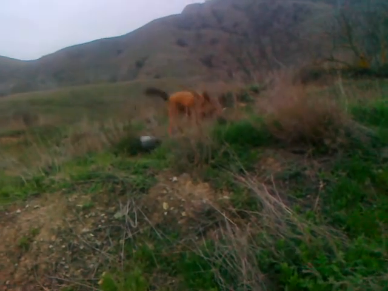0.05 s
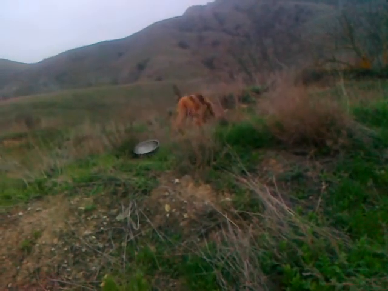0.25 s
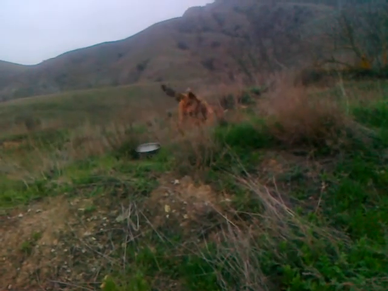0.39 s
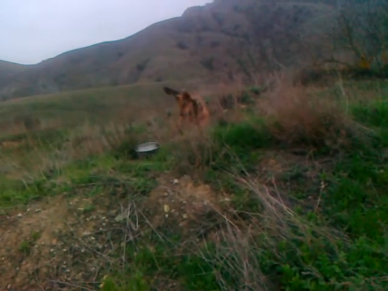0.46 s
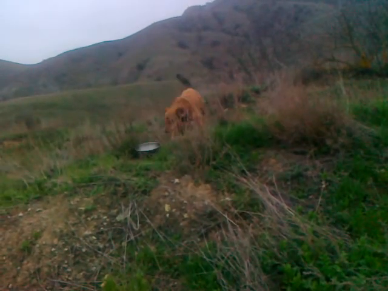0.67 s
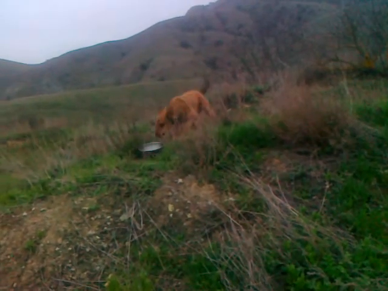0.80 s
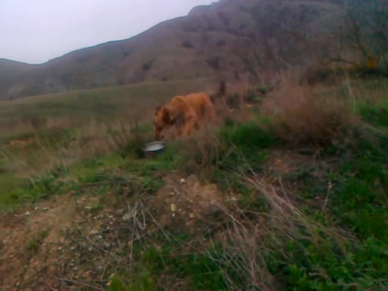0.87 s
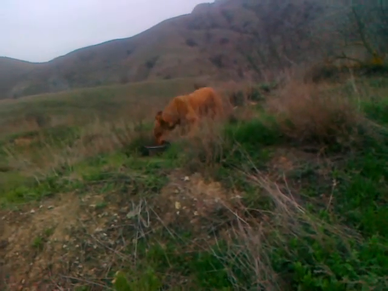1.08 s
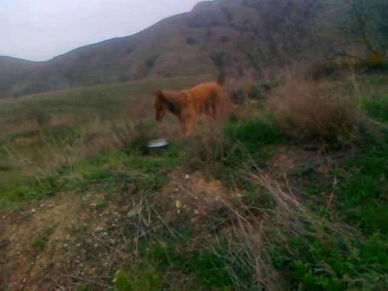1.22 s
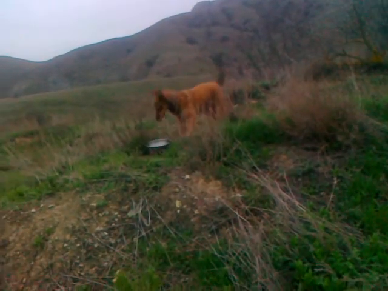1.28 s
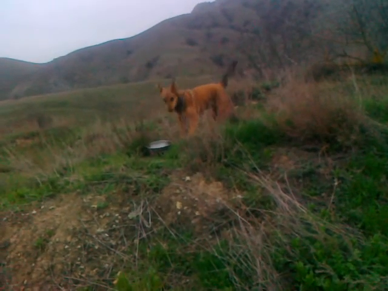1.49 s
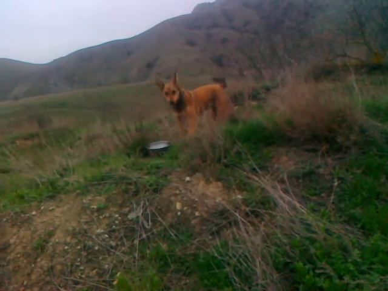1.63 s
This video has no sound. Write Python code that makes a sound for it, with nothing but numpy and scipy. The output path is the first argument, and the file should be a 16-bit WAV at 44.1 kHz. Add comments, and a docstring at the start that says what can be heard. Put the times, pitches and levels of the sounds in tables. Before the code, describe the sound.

Two quick, raspy dog barks stand out over wind buffeting the microphone outdoors. A metal bowl first lands with a dull thud and faint clinks, then come the barks, followed by a quiet huff.

```python
"""Wind rumbles on the microphone throughout, over faint hiss, on a grassy hillside.
First a steel bowl thuds on the turf and clinks faintly. At 0.6 s and 0.85 s a dog gives two short
harsh barks, vocal-fold pulses and turbulence ringing its throat: each arches in pitch, breaks into
a rasp, settles on a clear note and drops. A soft huff follows at 1.1 s.
The slope answers each sound briefly."""
import sys
import numpy as np
from scipy import signal
from scipy.fft import rfft, irfft, next_fast_len
from scipy.io import wavfile
from scipy.ndimage import uniform_filter1d, minimum_filter1d, map_coordinates

SR = 44100
rng = np.random.default_rng(int(sys.argv[2]) if len(sys.argv) > 2 else 0)


def wav_record(signal):
    """Record a signal, one row per channel, as 16-bit PCM in the file named by sys.argv[1]."""
    frames = np.transpose(np.atleast_2d(signal))
    bounded = np.clip(frames, -1, 1)
    # unit amplitude maps onto the largest positive 16-bit level
    quanta = np.round(bounded * 32767).astype(np.int16)
    wavfile.write(sys.argv[1], SR, quanta)


N = 72765


def amp(db):
    """dB to gain."""
    return 10 ** (np.asarray(db) / 20)


def unit(x):
    """Scale to rms 1."""
    return x / np.sqrt(np.mean(x ** 2) + 1e-20)


def steady(x, size):
    """Hold the short-term rms at 1; size in samples."""
    power = uniform_filter1d(uniform_filter1d(x ** 2, size), size)
    return x / np.sqrt(np.abs(power) + 1e-20)


def along(points, hz):
    """Read (f/Hz, value) points on a log axis."""
    f, values = np.transpose(points)
    return np.interp(np.log(hz + 1), np.log(f + 1), values)


def clock():
    """Sample times in s."""
    return np.arange(N) / SR


def curves(rows):
    """One value per sample for each column after the time."""
    times_s, *columns = np.transpose(rows)
    return [np.interp(clock(), times_s, column) for column in columns]


def wobble(knots_per_s):
    """Smooth random curve."""
    return map_coordinates(rng.standard_normal(N // 8), [clock() * knots_per_s], mode="wrap")


def filtered(x, response):
    """Apply a frequency response."""
    size = next_fast_len(N + SR // 2)
    return irfft(rfft(x, size) * response(np.fft.rfftfreq(size, 1 / SR)), size)[:N]


def below(hz, edge_hz, order):
    """Gain of a smooth low-pass."""
    return 1 / (1 + (hz / edge_hz) ** order)


def noise(colour):
    """Coloured noise, rms 1."""
    return unit(filtered(rng.standard_normal(N), lambda hz: amp(along(colour, hz))))


def resonator(colour, hz):
    """Minimum-phase response of a cavity with this colour."""
    cepstrum = irfft(np.log(amp(along(colour, hz))))
    half = len(cepstrum) // 2
    fold = np.concatenate([[1], np.full(half - 1, 2), [1], np.zeros(half - 1)])
    return np.exp(rfft(cepstrum * fold))


# hiss spectrum: f/Hz, relative level/dB
HISS_COLOUR = [(500, 4.5), (3000, -2), (8000, -2), (15000, -4)]
# hiss envelope: t/s, level/dB
HISS_ENVELOPE = [(0, -74), (.58, -75), (.64, -90), (1.65, -84)]


def microphone_hiss():
    """Faint microphone noise; the level dips at the first bark."""
    return amp(curves(HISS_ENVELOPE)[0]) * noise(HISS_COLOUR)


# gusts: t/s, rumble level/dB, rush level/dB
GUSTS = [(0, -27.5, -59), (.13, -28, -60), (.18, -27.5, -53), (.23, -27, -46.5), (.31, -27.5, -48),
         (.375, -30, -57), (.42, -30, -50), (.465, -29, -48), (.505, -30.5, -56), (.54, -30.5, -48),
         (.60, -30, -52), (.66, -38, -54), (.82, -37, -57), (1.05, -35.5, -54), (1.22, -33, -50),
         (1.33, -31.5, -47), (1.39, -31, -50), (1.44, -30, -45.5), (1.485, -29.5, -50), (1.53, -28.5, -45),
         (1.65, -29.5, -50)]
# low and mid wind spectra: f/Hz, relative level/dB
RUMBLE_COLOUR = [(10, -16), (30, -6), (65, 2), (110, -2), (200, -4.5), (320, -7), (430, -14.5), (600, -27),
                 (1000, -46), (2000, -76), (4000, -100)]
RUSH_COLOUR = [(200, -14), (450, 0), (700, -2.5), (1120, -7), (1450, -22), (2300, -39), (3000, -51),
               (6000, -70)]


def wind(rumble_swing_db=.7, rush_swing_db=1.6):
    """Buffeting on the microphone: a deep rumble under a flickering rush."""
    rumble_db, rush_db = curves(GUSTS)
    rumble = amp(rumble_db + rumble_swing_db * wobble(30)) * steady(noise(RUMBLE_COLOUR), size=1500)
    rush = amp(rush_db + rush_swing_db * wobble(90)) * noise(RUSH_COLOUR)
    return rumble + rush


# scatter decay: f/Hz, t60/s
SCATTER_DECAY = [(200, .27), (600, .19), (1100, .22), (2000, .18), (5000, .2), (12000, 0.091)]
# scatter spectrum: f/Hz, relative level/dB
SCATTER_COLOUR = [(330, 9), (600, -2), (850, 6), (1400, 1), (2200, -2), (3100, 3), (6000, 3), (12000, -6)]


def hillside(x, scatter_db=-16.5, rise_s=.015, echo_s=.058, echo_db=-27):
    """Scatter from ground and brush swells and dies; the bank behind the dog returns one echo."""
    hz, t, spectrum = signal.stft(rng.standard_normal(SR // 2), SR, nperseg=256)
    envelope = amp(-60 * t / along(SCATTER_DECAY, hz)[:, None]) * (1 - np.exp(-t / rise_s))
    tail = signal.istft(spectrum * envelope, SR, nperseg=256)[1]
    scatter = signal.fftconvolve(x, tail / np.linalg.norm(tail))[:N]
    scatter = filtered(scatter, lambda f: amp(along(SCATTER_COLOUR, f)))
    echo = filtered(x, lambda f: np.exp(-2j * np.pi * f * echo_s) * below(f, 4000, order=2))
    return amp(scatter_db) * scatter + amp(echo_db) * echo


# bowl contacts: t/s, level/dB
BOWL_CONTACTS = [(0.021, -51), (.092, -68), (.150, -72)]
# steel modes: f/Hz, relative level/dB, t60/s
BOWL_MODES = [(2300, -13, .2), (5540, -5, .15), (5900, -7, .12), (6600, -12, .09), (7060, -3, .1),
              (7650, -7, .11), (8450, -13, .09), (9100, -4.5, .08)]
# grit on steel: f/Hz, relative level/dB
SCUFF_COLOUR = [(1500, -12), (2400, -11), (3500, -21), (4600, -19), (5600, -9), (7600, 2), (9200, -6),
                (11000, -16), (15500, -27)]


def bowl_clinks(attack_s=.0013, scuff_db=2, scuff_t60_s=.098):
    """The steel bowl settles on stony ground: each contact rings its modes over a gritty scuff."""
    clinks = np.zeros(N)
    for start_s, contact_db in BOWL_CONTACTS:
        t = np.maximum(clock() - start_s, 0)
        ring = np.zeros(N)
        for hz, mode_db, t60_s in BOWL_MODES:
            decay = amp(mode_db + rng.normal(0, 2.2) - 60 * t / t60_s)
            ring += decay * np.sin(2 * np.pi * hz * t + .91 * wobble(300))
        scuff = amp(scuff_db - 60 * t / scuff_t60_s) * noise(SCUFF_COLOUR)
        clinks += amp(contact_db) * (1 - np.exp(-t / attack_s)) * (ring / 2 + scuff)
    return clinks


# bowl landing: t/s, f/Hz, level/dB, attack/s, t60/s
BOWL_LANDING = (.047, 430, -15, .004, .04)


def bowl_thud():
    """The bowl lands on soft turf: one damped low tone."""
    start_s, hz, level_db, attack_s, t60_s = BOWL_LANDING
    t = np.maximum(clock() - start_s, 0)
    envelope = amp(level_db - 60 * t / t60_s) * (1 - np.exp(-t / attack_s))
    return envelope * np.sin(2 * np.pi * hz * t)


# breath envelope: t/s, attack/s, hold/s, t60/s, level/dB
HUFF_ENVELOPE = (1.133, .02, .042, .15, -31)
# breath spectrum: f/Hz, relative level/dB
BREATH_COLOUR = [(120, -22), (280, -1), (380, -3), (460, 3), (560, -3), (690, 3), (850, -12), (1150, -23),
                 (1450, -19), (1750, -27), (2050, -22), (2450, -35), (2800, -32), (3100, -52), (4200, -47),
                 (5200, -66), (12000, -85)]


def huff(flutter_hz=85, flutter_db=2.0):
    """A soft half-bark: a puff of air through fluttering lips."""
    start_s, attack_s, hold_s, t60_s, level_db = HUFF_ENVELOPE
    t = clock() - start_s
    envelope = np.clip(t / attack_s, 0, 1) * amp(-60 * np.maximum(t - attack_s - hold_s, 0) / t60_s)
    gain = amp(level_db + flutter_db * wobble(2 * flutter_hz))
    return gain * envelope * steady(noise(BREATH_COLOUR), size=500)


# bark gestures: t/s, f/Hz, fundamental level/dB, overtones/dB re fundamental, roughness/0-1
FIRST_GESTURE = [(.585, 540, -36, -4, .3), (.590, 639.2, -22, -3, .1), (.600, 673.4, -21, 5.5, .12),
                 (.608, 594.3, -20.5, 8, .35), (.626, 546.4, -15.5, 1, .7), (.641, 605.7, -18, 2, .7),
                 (.648, 660.3, -16, -1, .07), (.668, 638, -14, -3, .05), (.674, 600, -17, -6, .4),
                 (.688, 530, -18, -8, .35), (.699, 440, -24, -14, .5), (.730, 350, -42, -9, .9)]
SECOND_GESTURE = [(.835, 300, -42, -11, .4), (.850, 410, -28, -8, .2), (.868, 495, -23, -10, .16),
                  (.877, 480, -17, -1, .3), (.888, 520, -13.5, -14, .42), (.902, 560, -13, -8.5, .3),
                  (.914, 576, -12.5, -11.5, .15), (.935, 568, -13.5, -10.5, .17),
                  (.948, 530, -18.5, -5, .3), (.958, 460, -24.5, -9.5, .42), (.978, 400, -43, -11, .8)]
# throat and mouth response, wide and narrow: f/Hz, relative level/dB
WIDE_TRACT = [(200, -48), (380, -17), (490, 0.5), (650, -1), (800, -6), (1120, -4), (1330, -10),
              (1550, -11), (1980, 1), (2150, -3), (2380, 2), (2620, -18), (2950, -24), (3250, -44),
              (4200, -44), (4900, -49), (5600, -40), (6400, -48), (7400, -46), (11000, -67), (16000, -80)]
NARROW_TRACT = [(200, -52), (350, -22), (455, -4), (590, -3.5), (750, -13), (1060, -6), (1400, -28),
                (1720, -7.5), (1950, -4), (2350, -12), (2700, -31), (3000, -31), (3400, -51), (4250, -46),
                (5000, -62), (5800, -44), (6400, -63), (7300, -51), (8600, -67), (11000, -76), (16000, -87)]


def bark(gesture, tract, jitter=.066, shimmer_db=7.5, knots_per_s=420, split_hz=818, air_hz=3340):
    """Vocal-fold pulses and turbulence ring the throat; roughness unsettles the pulses and adds air."""
    pitch_hz, level_db, overtones_db, roughness = curves(gesture)
    jittered_hz = pitch_hz * (1 + jitter * roughness * wobble(knots_per_s))
    phase = 2 * np.pi * np.cumsum(jittered_hz) / SR
    pulses = sum(np.cos(k * phase) for k in range(1, 13)) * np.sqrt(4 * pitch_hz / SR)
    shimmer = amp(shimmer_db * roughness * wobble(knots_per_s))
    pulses = filtered(pulses * shimmer, lambda hz: below(hz, air_hz, order=10))
    puffs = unit(rng.standard_normal(N) * (1 + .9 * np.cos(phase)))
    air = filtered(puffs, lambda hz: 1 - below(hz, air_hz, order=10))  # treble is all turbulence

    def voice(rasp, band):
        """One band at rms 1; rasp is the turbulent share of power below air_hz."""
        share = np.clip(rasp, 0, 1)
        source = np.sqrt(1 - share) * pulses + np.sqrt(share) * (puffs - air) + air
        return steady(filtered(source, lambda hz: resonator(tract, hz) * band(hz)), size=330)

    fundamental = voice(rasp=1.15 * roughness ** 2, band=lambda hz: below(hz, split_hz, order=12))
    overtones = voice(rasp=1.2 * roughness, band=lambda hz: 1 - below(hz, split_hz, order=12))
    start_s, end_s = gesture[0][0], gesture[-1][0]
    gate = uniform_filter1d(1.0 * (clock() > start_s) * (clock() < end_s), size=130)
    return gate * amp(level_db) * (fundamental + amp(overtones_db) * overtones)


def scene():
    """Dog and bowl on the hillside, in wind."""
    dog = bark(FIRST_GESTURE, WIDE_TRACT) + bark(SECOND_GESTURE, NARROW_TRACT) + huff()
    direct = dog + bowl_clinks() + bowl_thud()
    return (microphone_hiss() + hillside(direct) + wind() + direct)[None]


def record(dry, ceiling_db=-3.5, cutoff_hz=15750):
    """Fast peak limiter, then a brick-wall low-pass."""
    x = dry[0]
    needed_gain = np.minimum(1, amp(ceiling_db) / (np.abs(x) + 1e-9))
    held_gain = minimum_filter1d(needed_gain, size=300)
    gain = uniform_filter1d(uniform_filter1d(held_gain, size=150), size=150)
    return filtered(x * gain, lambda hz: hz < cutoff_hz)[None]


dry = scene()
out = record(dry)
wav_record(out)
```